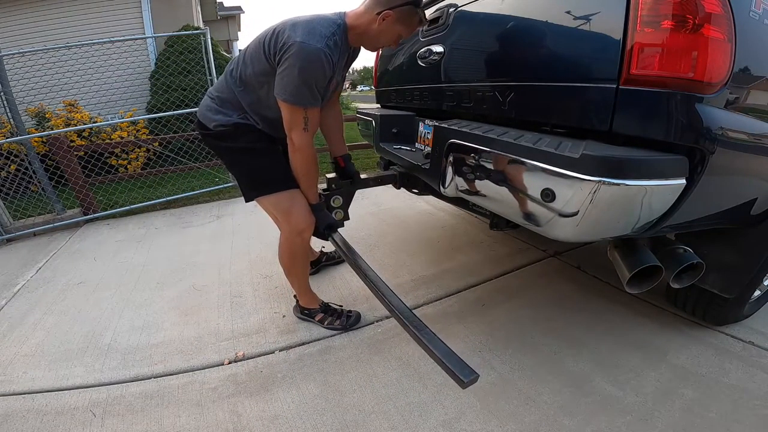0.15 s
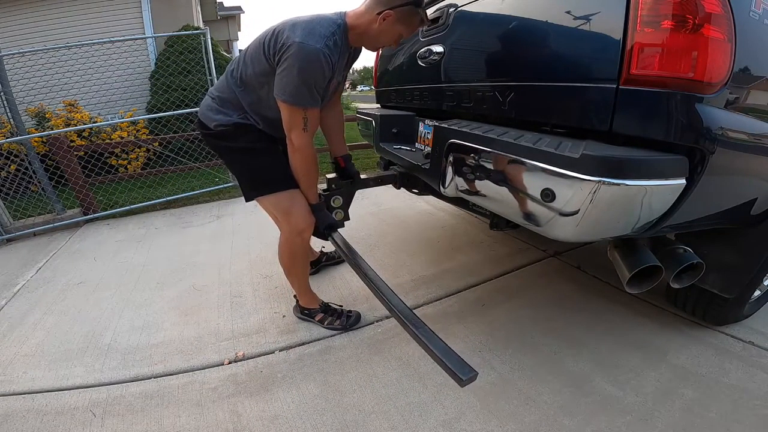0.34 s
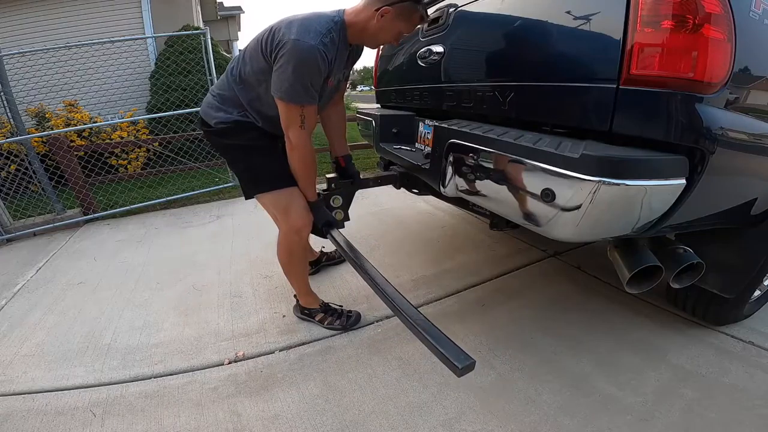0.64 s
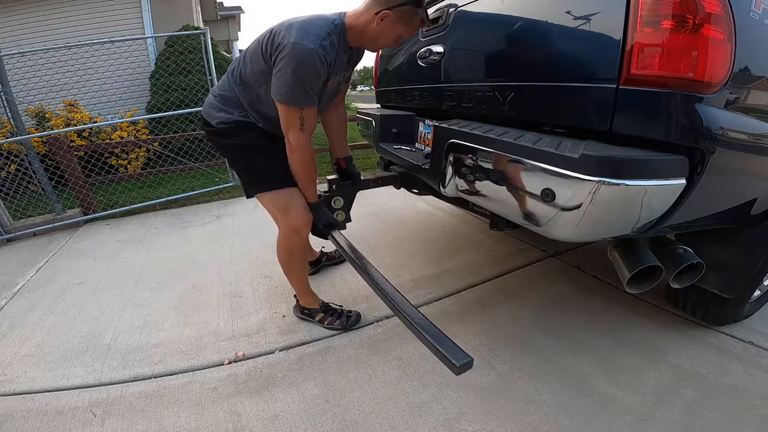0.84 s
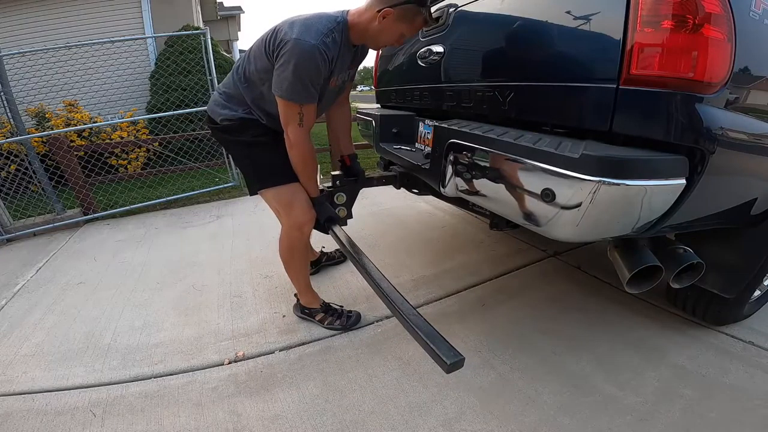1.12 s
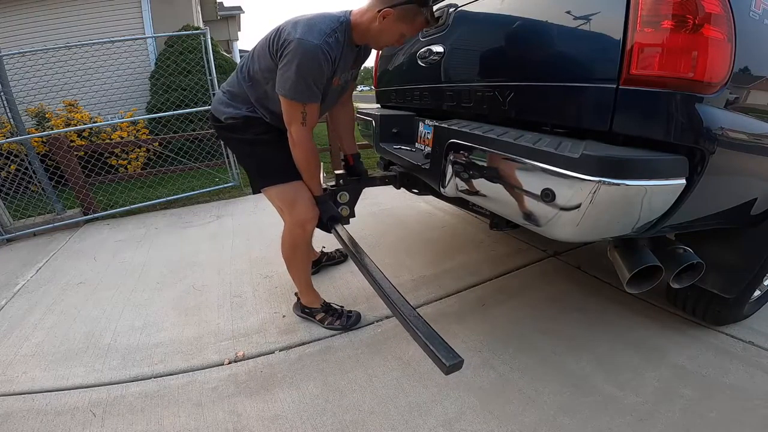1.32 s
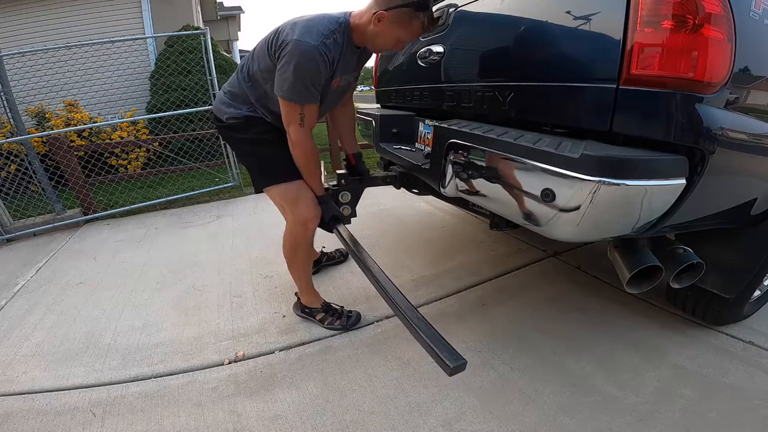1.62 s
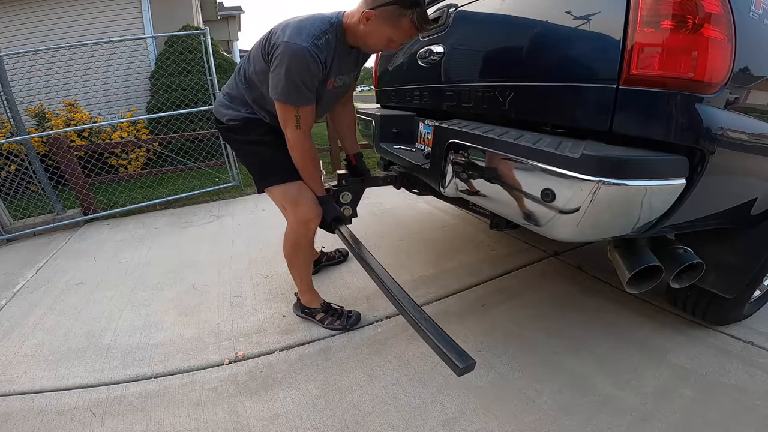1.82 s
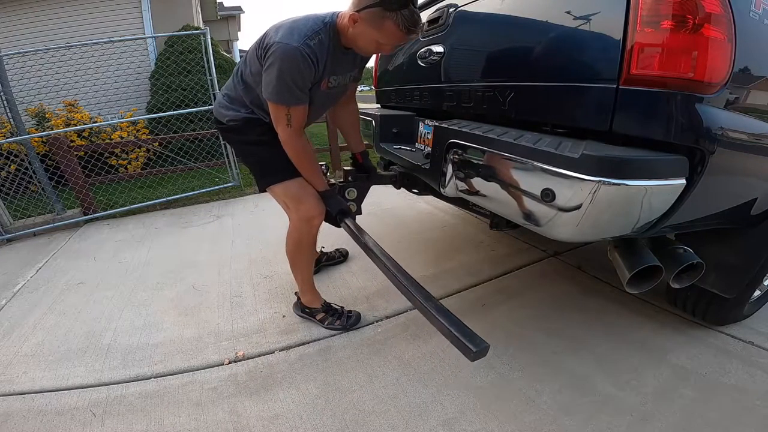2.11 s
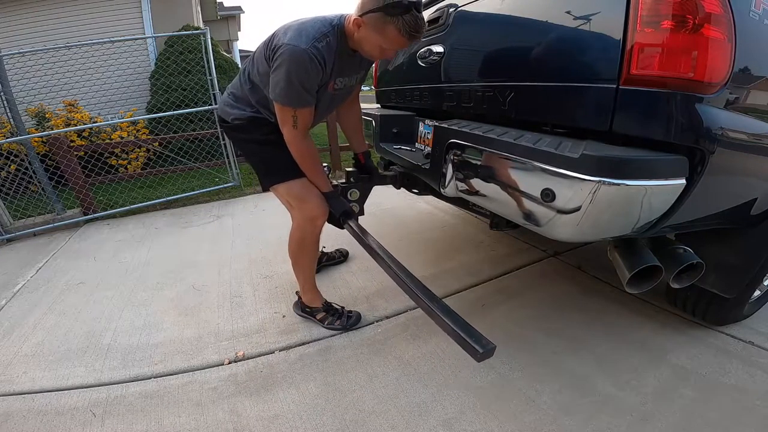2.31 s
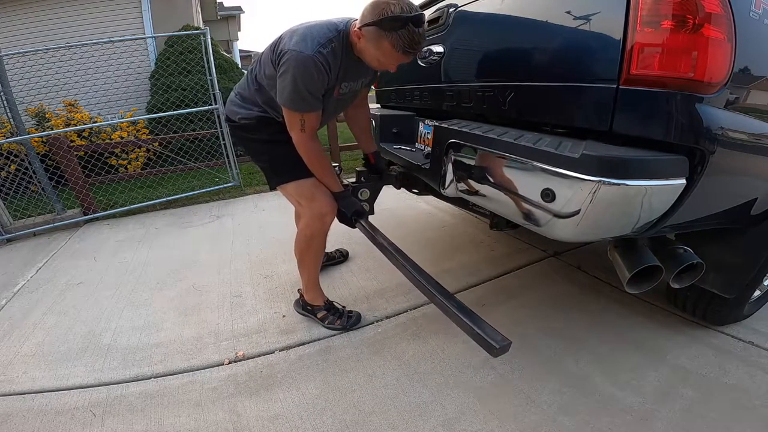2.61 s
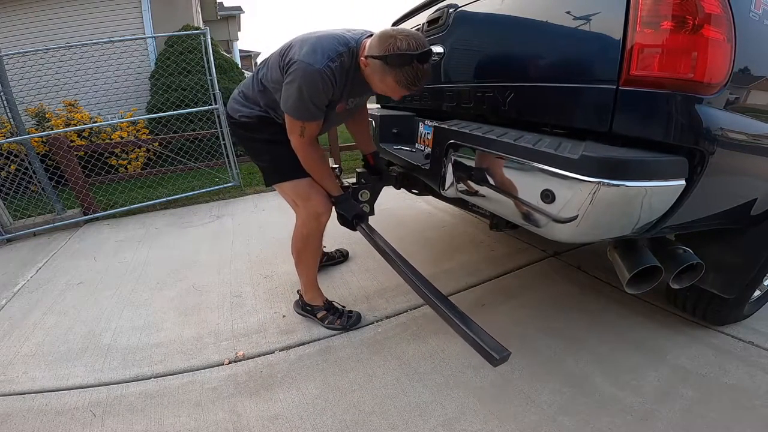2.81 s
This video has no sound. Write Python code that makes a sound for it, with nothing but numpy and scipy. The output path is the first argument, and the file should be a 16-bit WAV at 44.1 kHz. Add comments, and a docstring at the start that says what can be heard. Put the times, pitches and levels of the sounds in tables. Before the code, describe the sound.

Heavy steel hitch clanks and knocks into a truck's receiver tube, with scraping and booming thuds

```python
"""Steel hitch knocked into a receiver tube

A heavy steel hitch is worked into a receiver tube on a parked truck, outdoors, near a small camera.
Each knock is a short force that rings the steel, rattles the frame and booms in the truck body.
Between knocks, trains of stick-slip clicks scrape and squeak the shank, and noise rocks the body modes.
Shaped stereo noise makes a quiet street floor, with a deep rumble that swells and fades."""
import sys
import numpy as np
from scipy import signal
from scipy.fft import rfft, irfft, next_fast_len
from scipy.io import wavfile
from scipy.ndimage import uniform_filter1d

SR = 44100
rng = np.random.default_rng(int(sys.argv[2]) if len(sys.argv) > 2 else 0)


def natural_amplitude(level_db):
    """Convert a level in decibels to a linear amplitude factor, elementwise."""
    exponent = np.asarray(level_db, float) / 20
    return 10 ** exponent


def wrap_up_sound(samples):
    """Save the sound to the file named by the first command line argument, as 16-bit audio."""
    columns = np.atleast_2d(samples).T
    # keep every value between -1 and 1, then stretch to whole-number steps
    tamed = np.clip(columns, -1, 1)
    steps = np.round(tamed * 32767).astype(np.int16)
    wavfile.write(sys.argv[1], SR, steps)


N = 130095  # length in samples
FRAME_DRAWS = 3  # random draws of the frame ring, used in turn by successive knocks
BODY_RISE_S = 0.017  # swelling time of the truck body

# truck body modes: (pitch_hz, level_db, t60_s); the rocking uses a third of the t60
BODY = [(48, -8.5, 0.15), (78, -12.5, 0.8), (91.1, -6.5, 0.29), (103.3, 4, 0.27), (166.3, -7, 0.41),
        (177.6, -4.5, 0.35), (207.1, -2, 0.33), (233.5, -9.5, 0.29), (320.6, -15.5, 0.53),
        (459, -8.5, 0.077), (527.4, -8, 0.09)]
# sliding of the shank, levels before each sound's own trim: (time_s, scrape_db, squeak_db, fine_grit_db)
SLIDE = [(.6, -91, -100, -110), (.66, -64, -57, -69), (.71, -86, -100, -110), (1.2, -84, -78, -100),
         (1.22, -60, -54, -72), (1.3, -49, -50, -80), (1.335, -73, -79, -110), (2.07, -58, -72, -100),
         (2.12, -41.5, -51, -71.5), (2.165, -60, -68, -76), (2.19, -49.5, -62, -97),
         (2.24, -58, -54.5, -67), (2.28, -96, -67, -100), (2.43, -45.5, -76, -96), (2.46, -59, -58, -74),
         (2.55, -44.5, -60.5, -83), (2.63, -75, -59.5, -91), (2.7, -51, -58, -71), (2.735, -44, -56, -52.5),
         (2.76, -42, -59, -60), (2.79, -30, -39, -58), (2.84, -59, -67, -74), (2.9, -44.5, -79, -99.5),
         (2.935, -54, -59, -68), (2.95, -52, -63, -74.5)]


def evened(x):
    """Scales to rms 1."""
    return x / np.sqrt(np.mean(x ** 2) + 1e-20)


def read(points, hz):
    """Reads a spectrum on a log-frequency axis."""
    f, value = np.transpose(points)
    return np.interp(np.log(hz + 1), np.log(f + 1), value)


def curve(rows, column):
    """One control curve at sample rate."""
    return np.interp(np.arange(N) / SR, np.array(rows)[:, 0], np.array(rows)[:, column])


def add(mix, s, sound):
    """Mixes a sound in at time s."""
    part = mix[round(s * SR):][:len(sound)]
    part += sound[:len(part)]


def dull(x, hz, kind="low"):
    """Third-order low-pass (or high-pass)."""
    return signal.sosfilt(signal.butter(3, np.clip(hz, 20, 20000), kind, fs=SR, output="sos"), x)


def through(force, response):
    """Passes a force through an impulse response."""
    return signal.fftconvolve(force, response)[:N]


def ringing(modes, rise_s):
    """Impulse response of decaying sine modes, swelling over rise_s, scaled by their summed power."""
    t = np.arange(SR) / SR
    ring = sum(natural_amplitude(db - 60 * t / t60) * np.sin(2 * np.pi * hz * t) for hz, db, t60 in modes)
    power = sum(natural_amplitude(2 * db) for _, db, _ in modes)
    return (1 - np.exp(-t / rise_s)) * ring / np.sqrt(power)


def pair_noise(shape_db, same, frames, size):
    """Spectra of two-channel noise, shaped over pitch and time, with a set left-right likeness."""
    hz = np.fft.rfftfreq(size, 1 / SR)[:, None]
    a, b, c, d = rng.standard_normal((frames, len(hz), 4)).T
    likeness = np.clip(read(same, hz), -1, 1)
    one, other = a + 1j * b, c + 1j * d
    spectra = np.array([one, likeness * one + np.sqrt(1 - likeness ** 2) * other])
    return spectra * natural_amplitude(shape_db(hz, np.arange(frames) * size / 4 / SR))


def slips():
    """Stick-slip: clicks at random times, of random sign and uneven size, scaled to unit power."""
    slips_per_s, spread_db = 3000, 2.5
    size = natural_amplitude(spread_db * np.minimum(rng.exponential(1, N), 4)) * rng.choice([-1, 1], N)
    return evened(size * (rng.random(N) < slips_per_s / SR))


def squeal(bands, level_db, pitch=1.):
    """Slips ringing narrow high resonances of the shank in the tube; the bands may follow a pitch curve."""
    drive, out = slips() * natural_amplitude(level_db), np.zeros(N)
    for centre, width, db in bands:
        turn = np.exp(2j * np.pi * np.cumsum(centre * pitch * np.ones(N)) / SR)
        r = np.exp(-np.pi * width / SR)
        low = drive / turn  # the band shifted down to 0 Hz, smoothed twice, then shifted back up
        for _ in range(2):
            low = signal.lfilter([1 - r], [1, -r], low)
        out += natural_amplitude(db) * (turn * low).real * np.sqrt(SR / width)
    return out


def street():
    """Far traffic and air: steady shaped noise, gently patchy in time and pitch."""
    level_db, patchy_db = -47, 1.3
    # relative spectrum of the street: (pitch_hz, level_db)
    street_spectrum = [(15, -43), (30, -21), (65, -10), (170, -2.5), (215, -13), (283, -22.5), (644, -30),
                       (1330, -29), (2340, -31.5), (5450, -33.5), (8000, -40), (9200, -51), (12000, -63.5),
                       (15000, -60.5)]
    # left-right likeness of the street: (pitch_hz, likeness)
    street_likeness = [(60, 0.99), (150, 1), (350, 0.87), (850, 0.53), (2060, 0.42), (5000, -0.22)]
    frames = N // 256 + 5
    patches = uniform_filter1d(rng.standard_normal((frames, 513)), 14, 0)
    patches = evened(uniform_filter1d(patches, 12, 1)).T

    def shape_db(hz, t):
        return read(street_spectrum, hz) + patchy_db * patches

    spectra = pair_noise(shape_db, street_likeness, frames, size=1024)
    noise = signal.istft(spectra, nperseg=1024, noverlap=768)[1][:, :N]
    return natural_amplitude(level_db) * evened(noise)


def rumble():
    """Low narrow noise that swells and fades, alike in both ports."""
    # swell of the rumble: (time_s, level_db)
    rumble_swell = [(0, -64), (.15, -41), (.27, -34.5), (.5, -53.5), (.75, -76), (1.0, -51), (1.3, -65),
                    (1.52, -42.5), (1.72, -37), (1.9, -37.5), (2.25, -54), (2.35, -41.5), (2.5, -46),
                    (2.8, -26), (2.95, -34)]
    band = dull(dull(rng.standard_normal(N), 34.8, "high"), 67)
    return natural_amplitude(curve(rumble_swell, column=1)) * evened(band)


def rocking():
    """Weight rocking the body: steady noise through the body modes, with a moving level."""
    shorter = 3  # shorter, broader body modes, for a smooth unlumpy rumble
    # strength of the rocking: (time_s, level_db)
    rock_level = [(0, -46), (.16, -77), (.3, -44.5), (.59, -65), (.75, -71), (.96, -35), (1.25, -43),
                  (1.64, -44), (1.94, -66), (2.15, -40), (2.3, -45.5), (2.45, -34), (2.55, -33),
                  (2.68, -32.5), (2.82, -21), (2.95, -35.5)]
    broad = ringing([(hz, db, t60 / shorter) for hz, db, t60 in BODY], BODY_RISE_S)
    noise = signal.fftconvolve(rng.standard_normal(N + SR), broad, "valid")[:N]
    return natural_amplitude(curve(rock_level, column=1)) * evened(noise)


def knocks():
    """Forces on the frame (per draw), on head, shank and tube, and on the body; soft contacts are duller."""
    first_touch = 5.7  # the first contact against the chatter after it
    soft_ring = 0.24  # exponent by which softer contacts ring the steel less
    push_per_softness = 1.16
    # knocks of the hitch: head first, then free shank, then shank in tube:
    # (start_s, steel_db, body_boom_db, contact_softness_ms, chatter_s)
    knock_rows = [(0.153, -50, -47.5, 0.092, 0.0076), (0.162, -30.5, -15.5, 0.35, 0.0033),
                  (.172, -30, -64, 1.06, 0.008), (0.7758, -17, -31, 0.49, 0.0025),
                  (.78, -14, -5.5, 0.14, 0.032), (1.11, -32, -48, 2, 0.051),
                  (1.216, -31.5, -19.5, 1.37, 0.03), (1.379, -37.5, -25, 1.26, 0.023),
                  (1.425, -61, -22.5, 0.7, .01), (1.649, -39, -26, 1.83, 0.004),
                  (1.802, -45, -26, 1.2, 0.016), (2.196, -32.5, -18, 1.25, 0.0013),
                  (2.271, -88, -4, 3.8, 0.014), (2.358, -31.5, -72, 0.78, 0.0026),
                  (2.523, -19.5, -12.5, 1.77, 0.0017), (2.604, -32.5, -37, 1.02, 0.036),
                  (2.653, -25.5, -64, 0.62, 0.013), (2.665, -27.5, -42, 0.61, .012),
                  (2.694, -27.5, -28, 0.22, 0.0043), (2.701, -12.5, -4.5, 0.55, 0.00064),
                  (2.718, -21.5, -3, 0.065, 0.0013), (2.738, -12, -39, 0.89, 0.0115),
                  (2.778, -32, -30, 0.1, 0.0053), (2.799, -19, -11, 0.74, 0.0032),
                  (2.824, -42, -14, 3.9, 0.0028), (2.845, -41, -28, 1.3, .01)]
    steel, struck, body = np.zeros((FRAME_DRAWS, N)), np.zeros((3, N)), np.zeros(N)
    t = np.arange(3000) / SR
    touch = 1. * (t == 0)
    for k, (s, db, boom_db, soft_ms, chatter_s) in enumerate(knock_rows):
        soft = soft_ms / 1000
        chatter = rng.standard_normal(len(t)) ** 3 / 4  # cubing makes it spiky
        burst = chatter + first_touch * np.sqrt(chatter_s * SR) / 4 * touch
        burst = burst * np.exp(-t / chatter_s)
        add(steel[k % FRAME_DRAWS], s, natural_amplitude(db) * dull(burst / np.linalg.norm(burst), 1 / soft))

        part = np.searchsorted((0.5, 1.0), s)  # head, then shank from 0.5 s, then tube from 1 s
        add(struck[part], s, natural_amplitude(db) * dull(touch, 1 / soft) * (0.29 / soft_ms) ** soft_ring)

        push = t * np.exp(-t / (0.00021 + soft * push_per_softness / 2))
        add(body, s, natural_amplitude(boom_db) * push / push.sum())
    return steel, struck, body


def clack(steel):
    """Short hard clack of each steel contact: a few very quickly damped modes."""
    # modes of the clack: (pitch_hz, level_db, t60_s)
    clack_modes = [(1515, 4.5, 0.036), (2140, -22, 0.012), (2765, 1, 0.019), (4270, -3, .008),
                   (7500, -3.5, 0.0073)]
    return natural_amplitude(-1.5) * through(steel.sum(0), ringing(clack_modes, .0001))


def ringing_steel(forces):
    """Head, shank and tube each ring their own modes under their own force."""
    # the cast head, bumped first: (pitch_hz, level_db, t60_s)
    head_modes = [(544.7, 1.5, 0.31), (855, 0, 0.1), (935, 1, 0.24), (1220, -7, .2), (1530, -17, 0.24),
                  (2680, -3.5, 0.16), (3920, -9, .15)]
    # the shank hanging free: (pitch_hz, level_db, t60_s)
    shank_modes = [(497, -5, .3), (829, -2, .17), (1556, -1, .2), (1712, -5, .3), (1990, -3, .28),
                   (2148, -7, .26), (2487, -8, .22), (2772, -11, .2), (3090, -9, .13), (3876, -5, .16),
                   (4021, -5, .14), (4195, -5, .1), (4307, 0, .17), (4635, -9, .16), (5373, -10, .16)]
    # the tube with the shank inside: (pitch_hz, level_db, t60_s)
    tube_modes = [(330, -0.5, 0.2), (410.4, -1, 0.27), (511.2, 1, 0.27), (604.4, -5, 0.51),
                  (797, 6.5, 0.14), (1025, 1, 0.19), (1230, 4, 0.17), (1770, -10.5, 0.13)]
    parts = zip(forces, (head_modes, shank_modes, tube_modes), (4, -4.5, -4.5))  # last: level in dB
    return sum(natural_amplitude(db) * through(force, ringing(modes, 0.00039)) for force, modes, db in parts)


def frame():
    """Dense modes of the tube and chassis: treble speaks first, each band dies at its own speed."""
    rise_cycles, low_hz = 3.5, 150
    # relative spectrum of the dense panel modes: (pitch_hz, level_db)
    panel_spectrum = [(120, -34), (220, 7.5), (350, 0), (520, -15), (680, -9.5), (900, -3), (1700, -4),
                      (2620, -6.5), (4190, -9.5), (5450, -18), (7500, -29.5), (9500, -45), (13000, -42)]
    # decay of the panel modes: (pitch_hz, t60_s)
    panel_decay = [(250, 0.49), (600, 0.42), (1200, 0.23), (3000, 0.23), (7000, 0.17), (12000, .12)]
    # left-right likeness of the steel: (pitch_hz, likeness)
    steel_likeness = [(150, 1), (850, .97), (2000, .93), (5000, .88), (10000, .6)]

    def shape_db(hz, t):
        rise = 1 - np.exp(-(t + 0.0016) * (hz + 1) / rise_cycles)
        return read(panel_spectrum, hz) - 60 * t / read(panel_decay, hz) + 20 * np.log10(rise)

    spectra = pair_noise(shape_db, steel_likeness, frames=500, size=256)
    ring = dull(signal.istft(spectra, nperseg=256, noverlap=192)[1], low_hz, "high")
    return ring / np.sqrt(np.mean(ring[:, :900] ** 2))


def rattle(steel):
    """Each row of forces passes through one random draw of the frame ring, damped once the shank is home."""
    level_db, seated_s, seated_db_per_s = -6, 2.84, -120
    panels = sum(signal.fftconvolve(force[None], frame(), axes=1)[:, :N] for force in steel)
    seated_for_s = np.maximum(np.arange(N) / SR - seated_s, 0)
    return natural_amplitude(level_db + seated_db_per_s * seated_for_s) * panels


def boom(body):
    """The push of each knock swells the low modes of the truck body."""
    return through(body, ringing(BODY, BODY_RISE_S))


def ticks():
    """Small dry ticks of grit or loose parts: very short damped clicks."""
    # ticks: (start_s, level_db, centre_hz)
    tick_rows = [(.396, -38, 1980), (0.469, -41.5, 2560), (.648, -42, 3550), (.68, -36.5, 4000),
                 (.955, -40.5, 6160), (1, -46, 7500), (1.041, -38, 9000), (1.127, -41, 5000),
                 (2.19, -46, 5000)]
    out, t = np.zeros(N), np.arange(200) / SR
    for s, db, hz in tick_rows:
        add(out, s, natural_amplitude(db) * np.exp(-t * hz / 0.47) * np.sin(2 * np.pi * hz * t))
    return out


def scrape():
    """Stick-slip forces of the sliding shank: dulled for each frame draw, full-band on the tube."""
    scrape_hz, scrape_db, tube_db = 2400, -35.5, 12  # low-pass; trim; extra on the tube
    level_db = curve(SLIDE, column=1) + scrape_db
    on_frame = np.array([dull(slips(), scrape_hz) * natural_amplitude(level_db) for _ in range(FRAME_DRAWS)])
    return on_frame, slips() * natural_amplitude(level_db + tube_db)


def squeak():
    """Slips ring a cluster of bands whose pitch steps up as the shank is pressed, then eases down."""
    # bands of the squeak: (multiple_of_squeak_pitch, width_hz, level_db)
    squeak_bands = [(0.82, 200, -8), (0.995, 170, 2.5), (1.1, 260, -4), (1.5, 260, -13)]
    # pitch of the squeak: (time_s, pitch_hz)
    squeak_pitch = [(1.245, 2740), (1.262, 2970), (1.33, 2940), (2.05, 2810)]
    return squeal(squeak_bands, curve(SLIDE, column=2), curve(squeak_pitch, column=1))


def fine_grit():
    """Slips ring broad, fixed bands high in the treble."""
    # bands of the grit: (centre_hz, width_hz, level_db)
    grit_bands = [(7150, 3300, 7), (9560, 830, -8), (11140, 560, -8.5), (12800, 900, -18.5)]
    return squeal(grit_bands, curve(SLIDE, column=3))


def whistle():
    """A brief thin high squeal: slips ring narrow, fixed bands."""
    # bands of the squeal: (centre_hz, width_hz, level_db)
    whistle_bands = [(5240, 70, -2), (6670, 90, -9), (7400, 110, -3), (7880, 70, 1.5), (8080, 100, -6)]
    # strength of the squeal: (time_s, level_db)
    whistle_level = [(1.205, -90), (1.218, -47.5), (1.24, -60), (1.255, -59), (1.28, -69), (1.3, -95)]
    return squeal(whistle_bands, curve(whistle_level, column=1))


def placed(pair):
    """The truck is to the right: the left port hears it a little later and softer."""
    # level of the steel, left minus right: (pitch_hz, level_db)
    left_level = [(150, 0), (400, -1.5), (2000, -1), (5000, -3), (12000, -3.5)]
    # phase by which left leads, negative for lagging: (pitch_hz, phase_radians)
    left_lead = [(30, -.05), (250, -.12), (500, -.3), (2000, -.75), (4000, -1.1), (8000, -1.5)]
    size = next_fast_len(N + SR // 20)
    hz = np.fft.rfftfreq(size, 1 / SR)
    half = natural_amplitude(read(left_level, hz) / 2) * np.exp(.5j * read(left_lead, hz))  # shared by both ports
    # a mirrored, fading tail keeps the end from wrapping round abruptly
    tail = pair[:, ::-1][:, :size - N] * np.linspace(1, 0, size - N)
    spectrum = rfft(np.concatenate([pair, tail], axis=1))
    return irfft(spectrum * np.array([half, 1 / half]), size)[:, :N]


def scene():
    """Forces pass through the steel and the body, then reach the two ports over the street."""
    steel, struck, body = knocks()
    on_frame, on_tube = scrape()
    clacks = clack(steel)  # knocks alone, without the scrape
    struck[-1] += on_tube
    mono = rocking() + clacks + ringing_steel(struck) + boom(body) + ticks()
    mono = mono + squeak() + fine_grit() + whistle()
    truck = placed(mono + rattle(steel + on_frame))
    return truck + street() + rumble()


def top_cut(x):
    """Nothing passes above the cut-off."""
    return signal.sosfilt(signal.butter(12, 14900, fs=SR, output="sos"), x)


def record(dry):
    """The camera's low cut at 35 Hz."""
    mix = dull(dry, 35, "high")
    return top_cut(mix)


dry = scene()
out = record(dry)
wrap_up_sound(out)
```